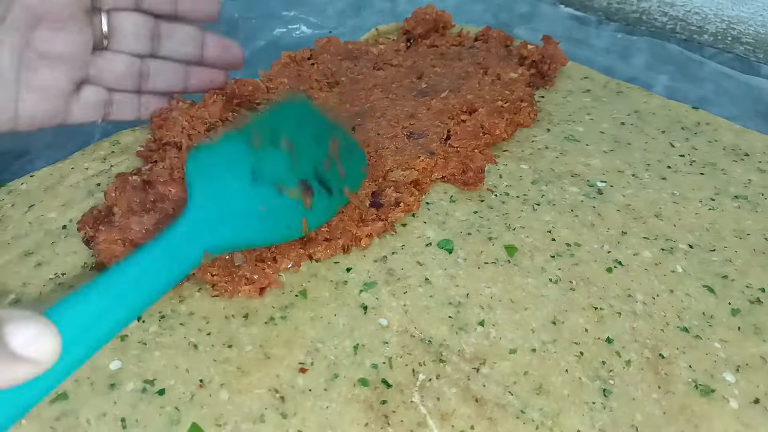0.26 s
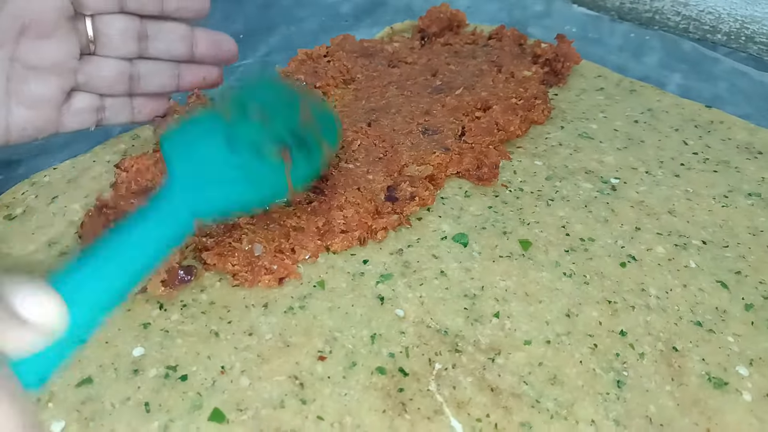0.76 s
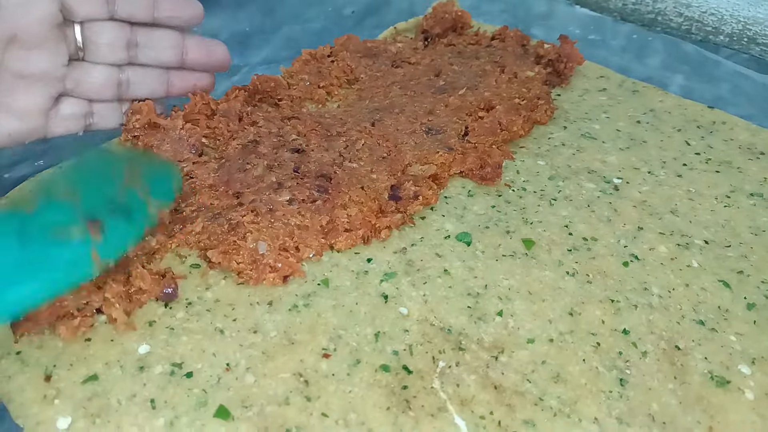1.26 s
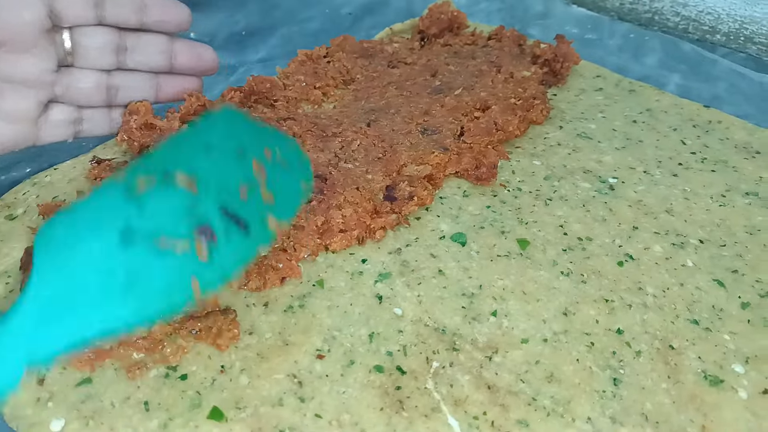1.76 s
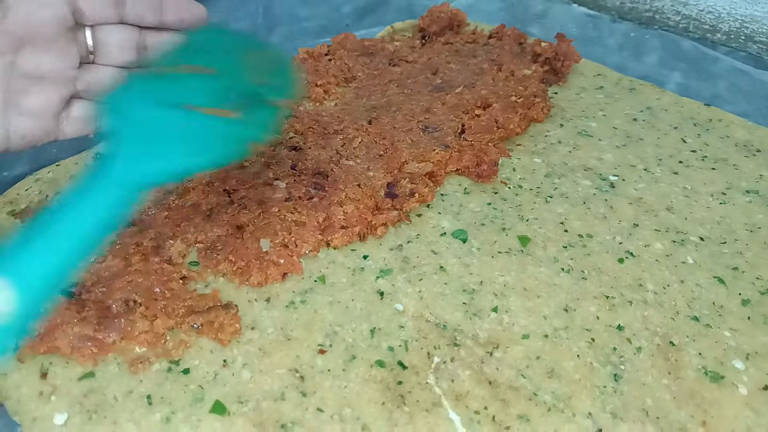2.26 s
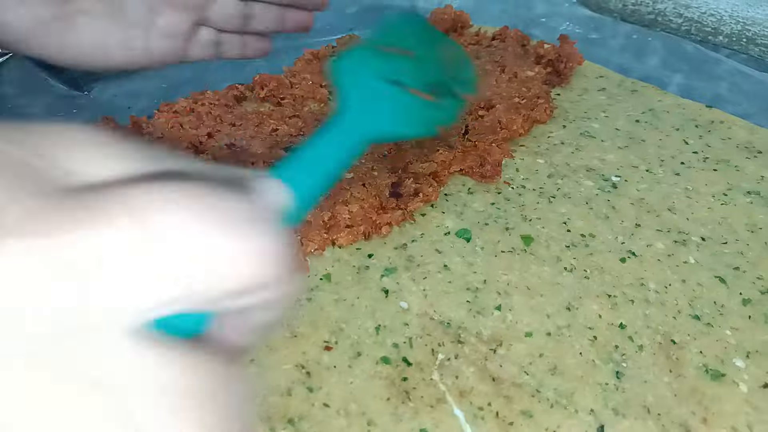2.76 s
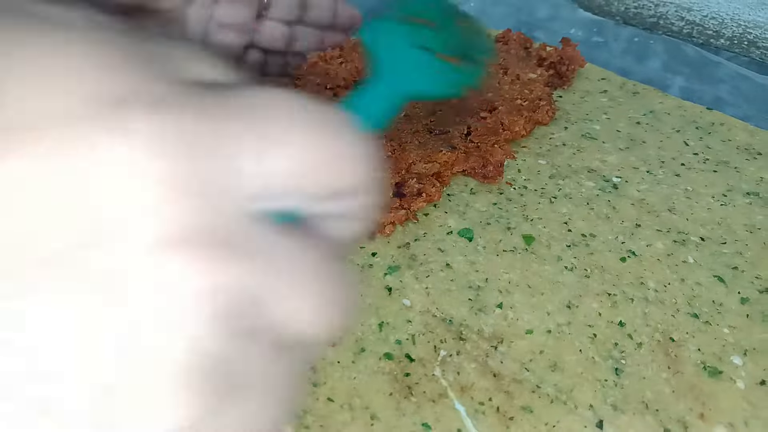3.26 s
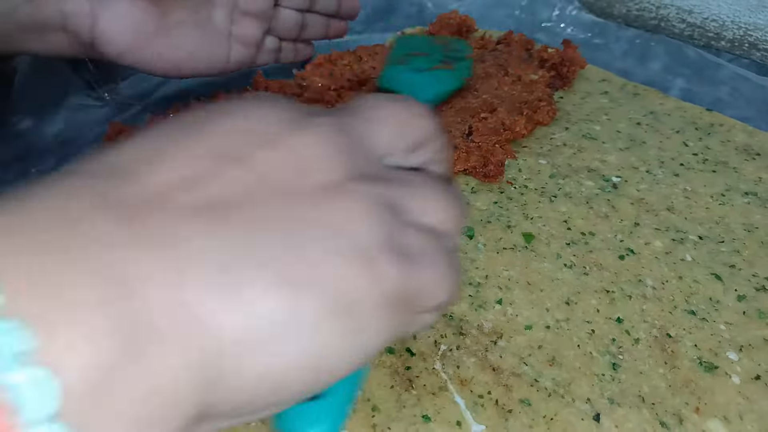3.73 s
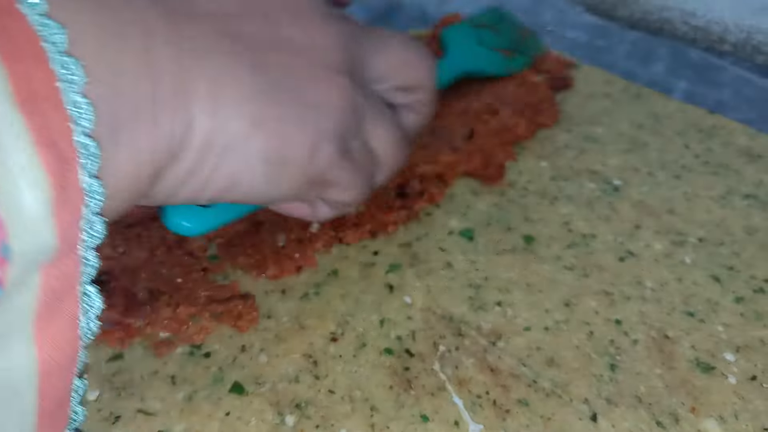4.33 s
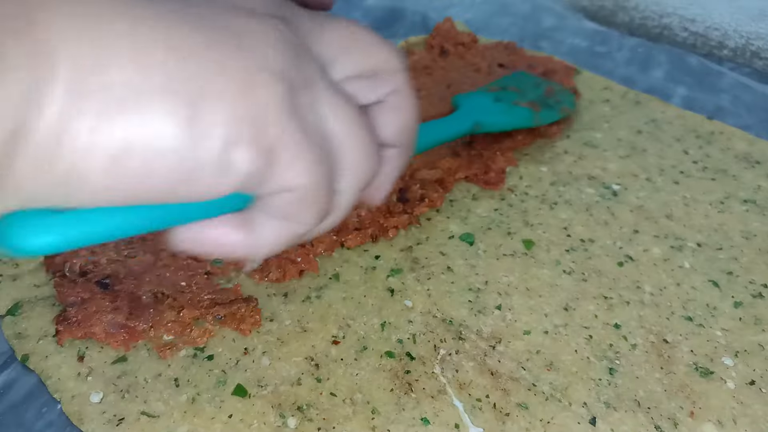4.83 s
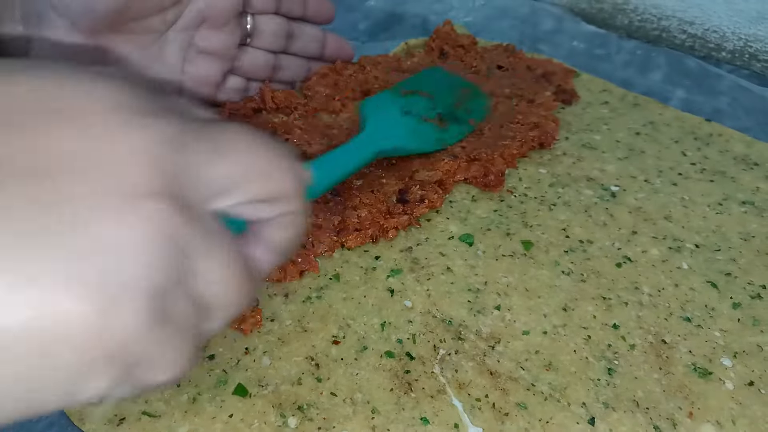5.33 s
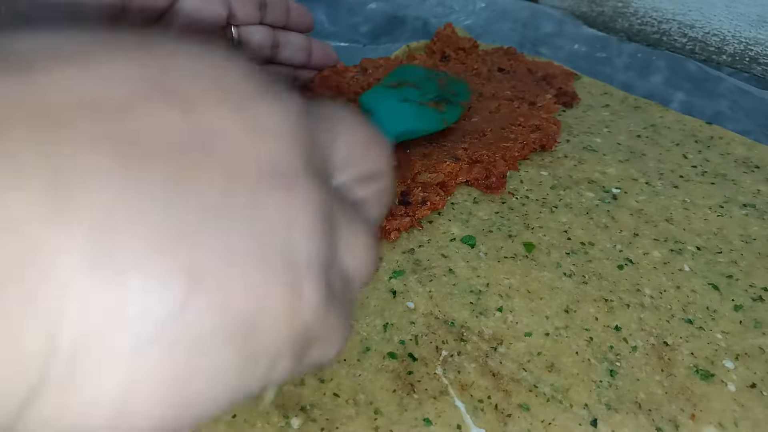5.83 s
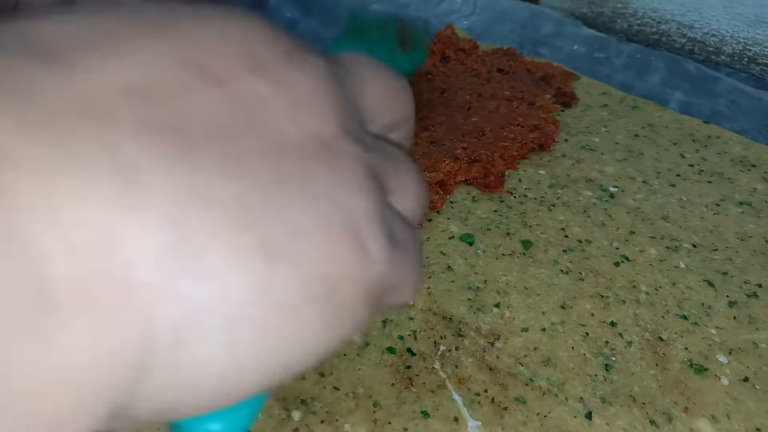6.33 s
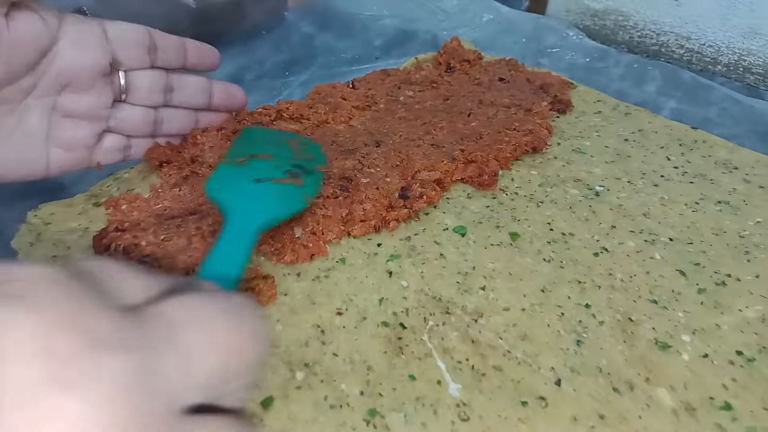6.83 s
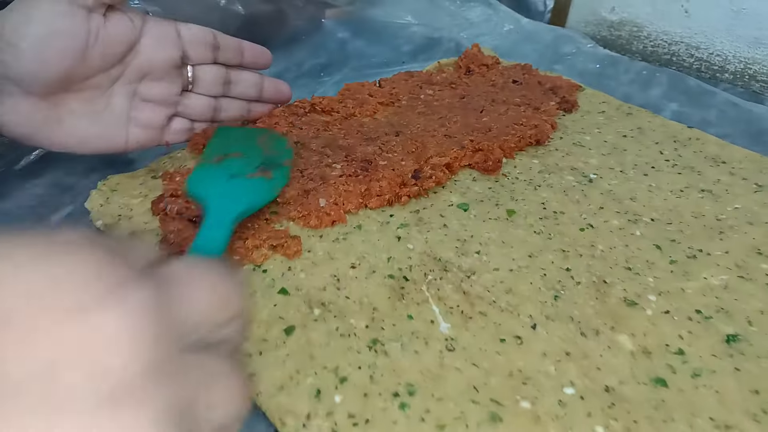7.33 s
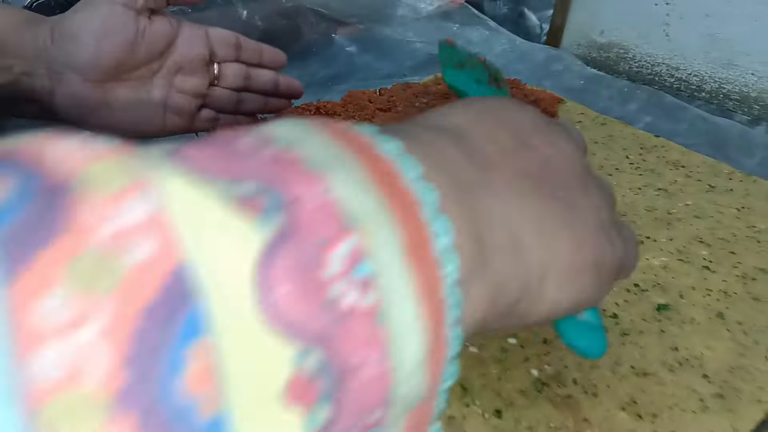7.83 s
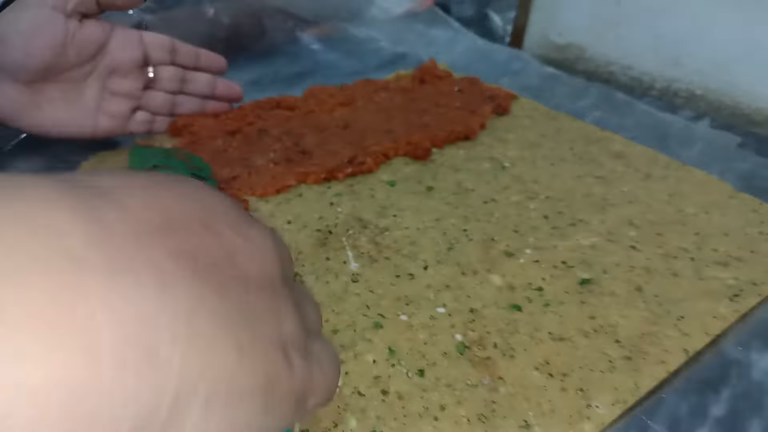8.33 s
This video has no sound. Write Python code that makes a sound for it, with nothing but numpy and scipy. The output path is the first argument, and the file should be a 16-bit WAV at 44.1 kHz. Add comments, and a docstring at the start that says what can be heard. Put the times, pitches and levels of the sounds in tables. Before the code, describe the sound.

In a small hard-surfaced kitchen, heard close in stereo, a spatula spreads moist filling over dough on a thin plastic sheet. A short crackle opens the scene, followed by sparse light ticks. From 0.7 to 1.3 s the film snaps in a dense flurry, with a dull low counter bump near 1.5 s. Crisp creases return strongly at 2.2-2.4 s, then continue irregularly through 2.6-4 s with muffled rubbing and small hollow wet pops, notably near 3.6 s. The sharpest snap lands at 4.05 s, then a near lull. Softer crinkles resume around 4.5-5 s, with a clear snap at 5.03. A brief hollow scrape comes at 5.95, light crackling near 6.25. Afterwards only scattered faint ticks and low bumps remain over room hiss; a tiny squeak at 8.25, a momentary dropout at 8.47, then a faint low hum and last tick.

```python
"""A thin plastic sheet on a kitchen counter crinkles as a spatula spreads moist filling over dough lying on it.
Crackle and snaps are noise bursts of buckling film, in flurries and one by one; the dough rubs as lumpy noise.
The filling pops as decaying sines; the counter shudders with a low mode; pulses tick, tones squeak, noise scrapes.
A hard small kitchen answers with decaying noise, over room tone; the sheet lies nearer the right microphone.
The sound drops out briefly near the end. Table levels stand ahead of the output gain."""
import sys
import numpy as np
from scipy import signal
from scipy.fft import rfft, irfft, next_fast_len
from scipy.io import wavfile
from scipy.ndimage import uniform_filter1d, map_coordinates

SR = 44100
rng = np.random.default_rng(int(sys.argv[2]) if len(sys.argv) > 2 else 0)


def to_wav(s):
    """Save 16-bit WAV."""
    ch = np.atleast_2d(s).T  # columns
    pcm = np.round(np.clip(ch, -1, 1) * 32767)  # PCM
    wavfile.write(sys.argv[1], SR, pcm.astype(np.int16))


N = 378819

# Left-right likeness of diffuse sound. Each row: frequency in Hz, correlation from 0 to 1.
ALIKE = [(60, 0.94), (300, 0.85), (700, 0.33), (1500, 0.0059)]


def amp(db):
    """Decibels are logarithmic: 20 dB is a factor of ten in amplitude."""
    return 10 ** (np.asarray(db) / 20)


def unit(x):
    """Normalises by effective value: scaled to rms 1."""
    return x / np.sqrt(np.mean(x ** 2) + 1e-20)


def along(points, hz):
    """Interpolates (Hz, value) points on a logarithmic frequency axis."""
    f, v = np.transpose(points)
    return np.interp(np.log(hz + 1), np.log(f + 1), v)


def curves(rows):
    """Linear interpolation in time: one value per sample for each column after the time."""
    s, *cols = np.transpose(rows)
    return [np.interp(np.arange(N) / SR, s, c) for c in cols]


def wobble(rate):
    """Slow random modulation: a smooth curve through rate random knots a second."""
    knots = rng.standard_normal(int(N * rate / SR) + 4)
    return map_coordinates(knots, [np.arange(N) * rate / SR])


def filtered(x, response):
    """Linear filtering: the spectrum of x times a response of frequency."""
    m = next_fast_len(N + SR // 2)
    hz = np.fft.rfftfreq(m, 1 / SR)
    return irfft(rfft(x, m) * response(hz), m)[..., :N]


def causal(db):
    """Minimum phase: folding the cepstrum gives a causal response for gains in dB on an rfft grid."""
    cepstrum = irfft(np.log(np.maximum(amp(db), 1e-6)))
    half = cepstrum.shape[-1] // 2
    cepstrum[..., 1:half] *= 2
    cepstrum[..., half + 1:] = 0
    return np.exp(rfft(cepstrum))


def place(s, shapes):
    """Superposition with a time-of-arrival difference: sums shapes (channel, event, sample) at times s."""
    left_lag = 16  # samples; the right microphone is nearer
    at = (np.round(s * SR).astype(int)[:, None] + np.arange(shapes.shape[-1])).ravel()
    return np.array([np.bincount(at + lag, shape.ravel(), N + SR)[:N]
                     for shape, lag in zip(shapes, (left_lag, 0))])


def diffuse(spectrum):
    """Diffuse field: stereo noise of rms 1 whose mid-side split sets the correlation in each band."""
    def split(hz):
        turn = np.arccos(np.clip(along(ALIKE, hz), -1, 1)) / 2
        return amp(along(spectrum, hz)) * [np.cos(turn), np.sin(turn)]

    mid, side = filtered(rng.standard_normal((2, N)), split)
    return unit(np.array([mid + side, mid - side]))


def swells(s, length, db, growth_db, rise, fall):
    """Incoherent addition of envelopes: each rises, holds with a slope and dies away; powers add."""
    knots = np.arange(0, N, 32)
    t = knots / SR - np.reshape(s, (-1, 1))
    length, db, growth_db = (np.reshape(v, (-1, 1)) for v in (length, db, growth_db))
    level = db + growth_db * np.clip(t / (length + 1e-3), 0, 1)
    level = level + rise * np.minimum(t, 0) - fall * np.maximum(t - length, 0)  # rise, fall in dB per s
    return np.interp(np.arange(N), knots, np.linalg.norm(amp(level), axis=0))


def buckle(tilt_db, t60, own, patchy_db, size):
    """Buckling of thin film: energy-1 rattle bursts; each microphone sees partly its own patch of film."""
    # Colour of the film. Each row: frequency in Hz, relative level in dB per Hz.
    film = [(200, -34), (450, -21.5), (1000, -18.5), (1800, -16.5), (2150, -8.5), (3200, -6.5),
            (6000, -3.5), (8500, -7.5), (9900, -12.5), (14500, -13), (15500, -25), (16500, -62)]
    rise_s, lead_s = 0.005, .002  # rise rate is 60 dB in rise_s; onset to peak
    echo_s, echo_share = .0026, .27  # weaker second burst, off a surface close by
    patch_octaves = 0.3  # width of the bands each crease favours
    t, hz = np.arange(size) / SR, np.fft.rfftfreq(size, 1 / SR)
    draw = rng.standard_normal((len(tilt_db), 3, size))
    rattle = np.sign(draw[:, :1]) + own * np.sign(draw[:, 1:])
    life = t60 * np.exp(.25 * draw[:, :1, -1:])  # decay times scatter around t60

    def burst_at(s):
        return amp(-60 * np.maximum((s - t) / rise_s, (t - s) / life))

    shape = burst_at(lead_s) + echo_share * burst_at(lead_s + echo_s)
    knots = rng.standard_normal((len(tilt_db), 1, 40))
    band = np.log2(hz / 500 + 1) / patch_octaves
    below, part = np.minimum(band.astype(int), 38), band % 1
    patch_db = patchy_db * (knots[..., below] * (1 - part) + knots[..., below + 1] * part)
    slope_db = tilt_db[:, None, None] * np.log2(hz / 5000 + 0.069)
    colour = causal(along(film, hz) + patch_db + slope_db)
    burst = irfft(rfft(rattle * shape) * colour, size)
    burst = burst / np.linalg.norm(burst, axis=2, keepdims=True)
    return np.swapaxes(burst, 0, 1)


def crackle(count):
    """Crackling noise: many small creases of uneven size and colour, in clumps, under each stroke."""
    # Spatula strokes. Each row: start in seconds, length in seconds, crackle level in dB,
    # growth along the stroke in dB, brightness in dB per octave.
    strokes = [(0, 0.042, -23, -17.5, 3), (0.42, 0.36, -54, 3, -1), (0.731, 0.33, -35, -19, -0.5),
               (1.063, 0.13, -29, -0.5, 0.5), (1.553, 0.21, -43.5, -8, 9), (1.81, 0.21, -58.5, 7, -3),
               (2.061, 0.15, -42.5, -4, -2.5), (2.198, 0.063, -32.5, 8, 0), (2.593, 0.19, -32, -6.5, 1),
               (2.844, 0.25, -35.5, -6.5, 2.5), (3.31, 0.16, -46.5, 1, -2.5), (3.499, 0.41, -37.5, 1.5, 0),
               (4.032, 0.12, -28.5, -8, 0.5), (4.447, 0.33, -65, -25, 3), (4.827, 0.21, -47, 12, 2),
               (5.355, 0.053, -47, -16, 3), (5.62, 0.018, -46.5, -2.5, -1), (5.887, 0.28, -52.5, 3.5, -1.5),
               (6.221, 0.061, -32, 5, 1), (6.66, 0.01, -39, -19, -4.5), (7.01, 0.15, -54, 5, 0),
               (7.448, 0.089, -49, 6, -1), (7.837, 0.071, -68, 0, -2), (8.04, 0.078, -46.5, 3, -3.5),
               (8.21, 0.12, -47, -5.5, -1), (8.498, 0.075, -48, -12, -2)]
    rest_db = -65  # the sheet keeps ticking faintly between strokes
    start, length, db, growth_db, bright_db = np.transpose(strokes)
    s, size, tilt, pan = rng.random((count, 4)).T
    s = s * N / SR
    stroke = np.searchsorted(start, s + .03, side="right") - 1
    gain = amp(-5 * np.log(size + 0.04) + np.outer([3, -3], pan - .4))  # few large, many small
    tilt_db = bright_db[stroke] + 6 * (tilt - .55)
    small = place(s, gain[..., None] * buckle(tilt_db, t60=0.0057, own=1.0, patchy_db=5.5, size=320))
    pull = amp(rest_db) + swells(start, length, db, growth_db, rise=2700, fall=220)
    clumps = amp(3.86 * wobble(23))
    return pull * unit(small * clumps)


def kitchen(x, blocks=30):
    """Reverberation: noise builds over 4 to 11 ms and decays; each block of time gets a freshly drawn tail."""
    # Reverberation time. Each row: frequency in Hz, time to fall 60 dB in seconds.
    decay = [(300, 0.22), (2000, 0.45), (6000, 0.27), (15000, 0.27)]
    out, step = np.zeros((2, N + 2 * SR)), N // blocks + 1
    for k in range(blocks):
        hz, t, z = signal.stft(rng.standard_normal((2, SR // 2)), SR, nperseg=256)
        turn = np.arccos(np.clip(along(ALIKE, hz), -1, 1))[:, None] / 2
        mid, side = z[0] * np.cos(turn), z[1] * np.sin(turn)
        fading = amp(-60 * t / along(decay, hz)[:, None])
        tail = signal.istft(np.array([mid + side, mid - side]) * fading, SR, nperseg=256)[1]
        tail = tail * np.clip((np.arange(tail.shape[1]) / SR - .004) / .007, 0, 1)
        tail = tail / np.linalg.norm(tail[0])
        wet = signal.fftconvolve(x[:, k * step:(k + 1) * step], tail, axes=1)
        out[:, k * step:k * step + wet.shape[1]] += wet
    return out[:, :N]


def rub():
    """Sliding friction: dough dragged over the counter makes lumpy noise, in a deep and an upper band."""
    # Slides. Each row: start in seconds, length in seconds, level in dB,
    # level of the part above the split relative to that in dB.
    slides = [(0, 0.17, -58.5, 1), (0.747, 0.069, -55.5, -3), (1.073, 0.23, -51.5, -26),
              (2.283, 0.082, -47.5, -19), (2.67, 0.4, -49, 0.5), (3.203, 0.14, -55, -5),
              (3.516, 0.36, -48.5, -3), (3.96, 0.12, -41, -10.5), (4.96, 0.17, -49.5, -6),
              (6.162, 0.26, -48.5, -2.5), (6.682, 0.02, -74, 11), (7.924, 0.12, -48.5, -19),
              (8.054, 0.091, -61, -2)]
    # Colour of the rub. Each row: frequency in Hz, relative level in dB per Hz.
    rub_colour = [(88, -3), (150, 2.5), (269, -3.5), (610, 1), (897, -1), (1800, -11.5), (2340, -71.5),
                  (3960, -120)]
    split_hz, rest_db, lump_db = 720, -62, 2.6  # band split, level between slides, unevenness
    s, length, rub_db, upper_db = np.transpose(slides)
    grit = diffuse(rub_colour)
    upper = filtered(grit, lambda hz: 1 / (1 + (split_hz / (hz + 1)) ** 6))

    def slide(db):
        return amp(rest_db) + swells(s, length, db, 0, rise=200, fall=150)

    bands = slide(rub_db) * (grit - upper) + slide(rub_db + upper_db) * upper
    return amp(lump_db * wobble(30)) * bands


def shudder():
    """Modal vibration: the counter's deepest mode wavers in pitch under weight, with low noise around it."""
    # Weight coming down. Each row: time in seconds, shudder gain in dB.
    bumps = [(0, -51), (.78, -45.5), (1.18, -48), (1.55, -33), (1.9, -44.5), (2.23, -44), (2.83, -51),
             (3.06, -51), (4.08, -59), (5.05, -56), (5.81, -49), (6.27, -47), (6.5, -51), (6.94, -55),
             (7.41, -45), (7.6, -53), (8.07, -45)]
    # Colour of the low noise. Each row: frequency in Hz, relative level in dB per Hz.
    low_colour = [(30, -66), (45, -1), (120, 21), (200, -27), (300, -64)]
    mode_hz = 52 + 5 * wobble(8)
    mode = np.sin(2 * np.pi * np.cumsum(mode_hz) / SR)
    s, db = np.transpose(bumps)
    return swells(s, 0, db, 0, rise=320, fall=58) * (0.95 * mode + 0.48 * diffuse(low_colour))


def air():
    """Background noise: room tone in passing patches; its treble drifts in level and leans left."""
    # Room tone. Each row: frequency in Hz, relative level in dB per Hz.
    air_colour = [(15, -39), (25, -4), (128, 7), (273, -2), (457, 2.5), (687, -29.5), (1640, -15.5),
                  (2400, -9), (5720, -10), (8600, -12.5), (9850, -19), (14400, -13), (16500, -35)]
    # Drift of the treble. Each row: time in seconds, gain in dB before the lean.
    hiss = [(0, 14.5), (.4, -1), (1.45, -4.5), (2.55, 7), (3.2, -7), (4.35, 4.5), (5.3, 3), (5.72, -1.5),
            (6.1, 9), (6.8, 2.5), (7.7, 3.5), (8.3, 4.5), (8.59, -1.5)]
    level_db, patch_db = -50.5, 1.5  # level before the treble drift; depth of the patches
    treble_hz, pan_db = 2200, 3  # where the treble starts; left over right
    z = signal.stft(diffuse(air_colour), nperseg=1024)[2]
    field = uniform_filter1d(rng.standard_normal(z.shape[1:]), size=6, axis=0)
    field = uniform_filter1d(field, size=9, axis=1)
    tone = unit(signal.istft(z * amp(patch_db * unit(field)), nperseg=1024)[1][:, :N])
    treble = filtered(tone, lambda hz: 1 / (1 + (treble_hz / (hz + 1)) ** 6))
    lean_db = pan_db * np.array([[.5], [-.5]])
    return amp(level_db) * (tone - treble + amp(curves(hiss)[0] + lean_db) * treble)


def snaps(patchy_db):
    """Snap-through buckling: the single creases that stand out release their energy at once."""
    # Creases. Each row: time in seconds, burst energy in dB midway between the channels,
    # brightness in dB per octave.
    creases = [(0.041, -12.5, -5.5), (0.077, -7, 11), (0.1445, 1.5, 1), (0.293, -16, -6), (0.429, -13.5, 4),
               (0.4672, -14.5, -6), (.5706, -23, 12), (0.701, -15, 4), (.744, -6, -2), (0.753, 4, -4),
               (0.7601, 8.5, 3), (0.8253, 1.5, 3.5), (0.9041, -2, -2.5), (.952, -8, -1), (0.9757, -11, -4),
               (.998, -7, -2), (1.0078, 8.5, 0.5), (1.0131, 9, 0.5), (1.056, -13, -1), (1.081, 11.5, -0.5),
               (1.0888, 0, 1), (1.134, -3, -4), (1.158, 6, 4), (1.170, -2, -4.5), (1.1788, 5, -2),
               (1.202, 2, 0), (1.227, -4, -2), (1.288, -2.5, 7), (1.3274, -7.5, -1), (1.43, -23, 4),
               (1.51, -5.5, 2.5), (1.5125, -5.5, 0), (1.545, -8, 3), (1.5813, -8.5, -0.5), (1.6, -9.5, 3),
               (1.65, -7, 11), (1.684, -10, 11), (1.705, -15, 14), (1.724, -7, 7.5), (1.74, -4, 11.5),
               (1.781, -15, -1), (1.818, 0, 5), (1.8672, -5.5, -5.5), (1.8975, -7, 7), (2.0511, -2.5, -3),
               (2.061, -1, -2), (2.137, -28, -2), (2.1713, -15, -1), (2.2164, -4, -3), (2.235, 10, -0.5),
               (2.249, 2, -1), (2.297, 12, -1.5), (2.3218, 9, 4.5), (2.391, -2, 0.5), (2.456, -3.5, -2),
               (2.464, -7.5, 2), (2.5372, -7, 2.5), (2.5988, 1, -2), (2.618, 1.5, -4), (2.629, -2.5, -2),
               (2.642, -8, -5), (2.654, -7, 3), (2.674, 1.5, 5), (2.69, -5, 17), (2.7096, 0, 1),
               (2.751, -2, 6), (2.7776, 1.5, 8), (2.852, -10, 4), (2.879, -4, 15), (2.886, -2, 11),
               (2.906, -0.5, -7), (2.93, 1.5, 7), (2.9485, -1.5, -3.5), (2.981, -3, -1), (3.035, -17, 2),
               (3.052, -8.5, -4), (3.0816, -4.5, -2.5), (3.121, -9.5, -3.5), (3.133, -13.5, 4),
               (3.213, -4, -4.5), (3.2556, 6, 1), (3.306, 3.5, 3), (3.3149, 7.5, -1.5), (3.3365, 4.5, -2),
               (3.406, -5, -4), (3.4319, 5, -2), (3.518, 6, 3.5), (3.5435, 0, -4.5), (3.603, 0, 0.5),
               (3.623, -6, 5), (3.6318, 8.5, 4.5), (3.644, -4.5, 2), (3.7043, 1.5, 4), (3.733, 0.5, -1.5),
               (3.739, 4, 4), (3.8052, 3, 1.5), (3.8257, -2, -0.5), (3.903, 1, -0.5), (3.945, 11, 4.5),
               (3.965, 0, 1), (3.9841, 6, 3), (3.9923, 6.5, -1.5), (4.0224, 2, -2), (4.0536, 19, 3),
               (4.3046, -17.5, -4.5), (4.44, -12, -7), (4.4535, -6, 7.5), (4.5164, -11, 2),
               (4.569, -10.5, 1.5), (4.596, -13, 6), (4.6329, -8, 0.5), (4.641, -5, 2), (4.658, -8, -0.5),
               (4.751, -19.5, -3), (4.8557, -2.5, 1.5), (4.888, -8, 6), (4.899, -5.5, -1.5),
               (4.907, -4.5, 5), (4.929, -9, 2), (4.9505, -10, 0), (4.979, -2.5, 7), (4.984, -2, -2.5),
               (5.0302, 9.5, -2), (5.134, -7.5, -1.5), (5.146, -4.5, -1.5), (5.211, -15, 1),
               (5.262, -17.5, 1.5), (5.367, -15, 0), (5.3973, -6.5, 3), (5.444, -7.5, 7), (5.5, -14.5, 11),
               (5.6443, -9, 11), (5.6557, -3.5, 10), (5.6616, -7, 7), (5.773, -10.5, -1), (5.7993, 2, 2.5),
               (5.816, -20, 9), (5.8216, -12, 5), (5.87, -15, -5), (5.8748, -9, 5), (6.091, -9.5, -4),
               (6.146, -16, 6), (6.153, -9.5, 8), (6.234, -3, 0), (6.247, 1, -2), (6.2742, 4, -2.5),
               (6.288, 4, -3.5), (6.3818, -3, -3), (6.398, -4.5, 3), (6.454, -3, -4), (6.6526, -4, 2.5),
               (6.673, -8, -4.5), (6.8853, -19, 2), (6.898, -18, -4), (7.026, -8.5, 2), (7.0338, -8.5, 7),
               (7.1259, -8.5, -3), (7.204, -16.5, -7.5), (7.342, -5.5, -3), (7.4824, -19, 6),
               (7.491, -18, 4), (7.5327, 0.5, 3), (7.5921, -12, 8), (7.768, -20.5, 3), (7.8243, -8, 2),
               (7.8372, -17, -1), (7.895, -16, 2.5), (8.0587, -11, -4), (8.363, -20.5, -10.5),
               (8.575, -8, -0.5)]
    s, db, tilt_db = np.transpose(creases)
    gain = amp(db + np.array([[.5], [-.5]]))
    burst = buckle(tilt_db, t60=.0098, own=1.0, patchy_db=patchy_db, size=1024)
    return place(s - .0007, gain[..., None] * burst)


def pops():
    """Resonance of an air pocket: each rings a few cycles in the filling, with a soft start."""
    # Pockets. Each row: time in seconds, peak in dB before the channel gains, pitch in Hz.
    pockets = [(0.141, -36.5, 430), (2.536, -38, 866), (2.597, -49, 790), (2.705, -32, 665),
               (2.895, -34, 620), (2.976, -36, 444), (3.122, -35.5, 426), (3.213, -36, 206),
               (3.255, -34.5, 514), (3.312, -32, 614), (3.557, -19.5, 482), (3.575, -23, 470),
               (3.591, -26, 474), (3.616, -28, 474), (3.669, -27.5, 604), (3.735, -29.5, 586),
               (3.764, -36, 543), (3.989, -22.5, 780), (4.657, -38.5, 640), (5.026, -25.5, 493),
               (6.651, -38, 810), (8.05, -41, 175)]
    s, db, hz = np.transpose(pockets)[..., None]
    cycles = hz * np.arange(2048) / SR
    decay = amp(-60 * cycles / 11)  # 60 dB in 11 cycles
    ring = decay * (1 - np.exp(-cycles / 0.87)) ** 2 * np.sin(2 * np.pi * cycles)
    ring = amp(db) * ring / np.abs(ring).max(1, keepdims=True)
    return place(s[:, 0] - .0012, ring * np.array([.9, 1.4])[:, None, None])


def ticks():
    """Impulse: one push and rebound, no ring, so the spectrum is broad."""
    # Ticks. Each row: time in seconds, peak in dB midway between the channels, left over right in dB.
    pulses = [(2.7762, -6, 4), (5.7999, -14, 14)]
    s, db, pan = np.transpose(pulses)
    u = np.arange(512) / SR / 0.00019
    gain = amp(db + np.outer([.5, -.5], pan))
    return place(s, gain[..., None] * (1 - 0.7 * u) * np.exp(-u / 1.82))


def scrape():
    """Resonant filtering: noise through two damped modes makes one short hollow scrape."""
    # The scrape. Each row: start in seconds, length in seconds, level in dB, growth in dB.
    drag = [(5.935, .13, -38, -6)]
    # Its resonances. Each row: frequency in Hz, width in Hz, gain in dB.
    hollow = [(562, 77, -2), (850, 110, -9.5)]

    def modes(f):
        return sum(amp(db) * 1j * f * w / (c * c - f * f + 1j * f * w) for c, w, db in hollow)

    noise = unit(filtered(diffuse([(500, 0)]), modes))
    return swells(*drag[0], rise=1200, fall=200) * noise


def squeak():
    """Harmonic tones: a squeak and a low hum, each one short swell of a tone and its octave."""
    # Tones. Each row: centre in seconds, half length in seconds, pitch in Hz, level in dB, octave level in dB.
    tones = [(8.247, 0.01, 1440, -54, -41), (8.55, 0.027, 160, -46, -70)]
    s, half, hz, db, octave_db = np.transpose(tones)[..., None]
    t = np.arange(N) / SR - s
    tone = amp(db) * np.sin(2 * np.pi * hz * t) + amp(octave_db) * np.sin(4 * np.pi * hz * t)
    return (tone * np.exp(-(t / half) ** 2)).sum(0)


def scene():
    """Superposition: direct sheet, filling and counter, with the kitchen's answer and air."""
    small, loud, pockets, sharp = crackle(count=2800), snaps(patchy_db=2.5), pops(), ticks()
    # the walls hear a crease from all sides, so more evenly
    to_room = amp(-5) * snaps(patchy_db=1.5) + amp(2.0) * small + amp(-4.0) * pockets + amp(-13.0) * sharp
    wet = kitchen(to_room, blocks=30)
    counter = rub() + shudder() + scrape()
    return loud + small + pockets + sharp + wet + counter + squeak() + air()


def record(dry):
    """Band limiting: output gain, a brief drop-out, and nothing above the limit."""
    # The drop-out. Each row: time in seconds, gain in dB.
    gap = [(8.452, 0), (8.464, -45), (8.477, -45), (8.49, 0)]
    gain_db, top_hz = -10, 16600
    return filtered(dry * amp(gain_db) * amp(curves(gap)[0]), lambda hz: hz < top_hz)


dry = scene()
out = record(dry)
to_wav(out)
```